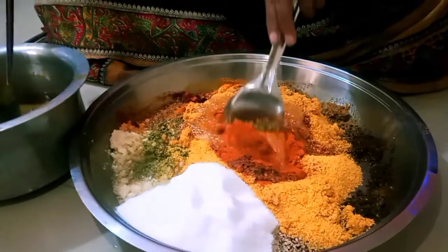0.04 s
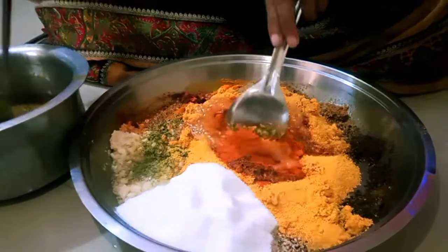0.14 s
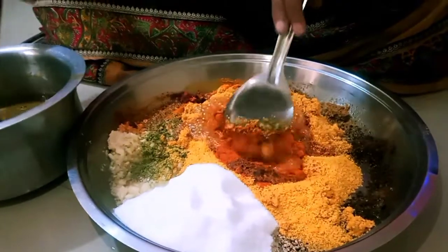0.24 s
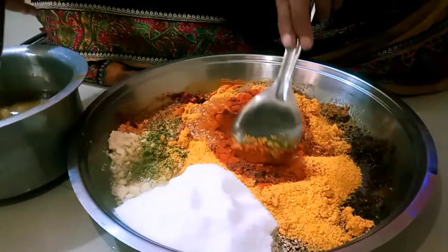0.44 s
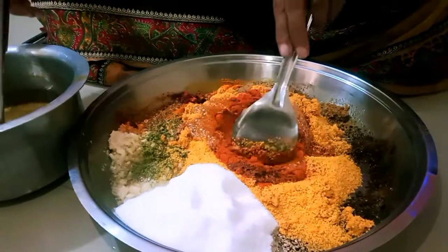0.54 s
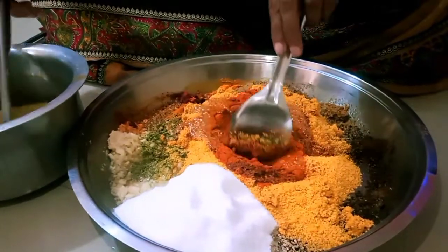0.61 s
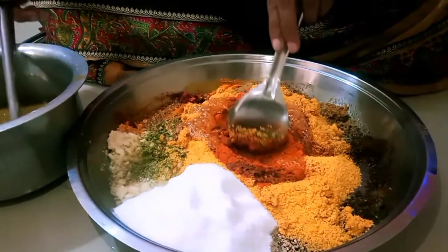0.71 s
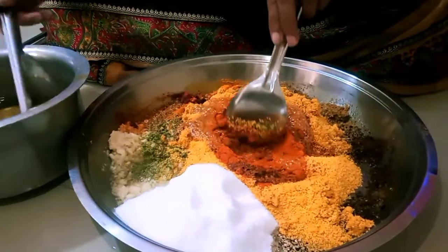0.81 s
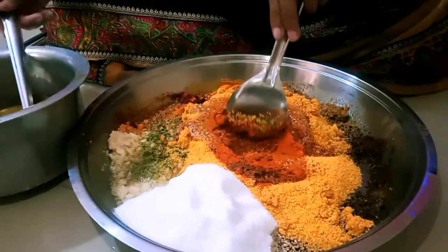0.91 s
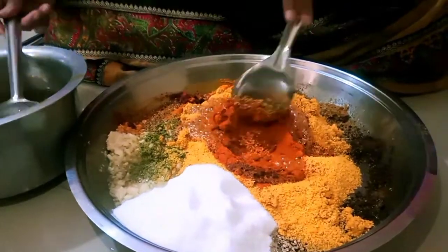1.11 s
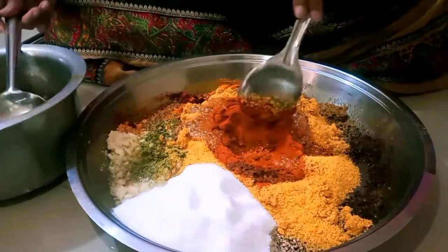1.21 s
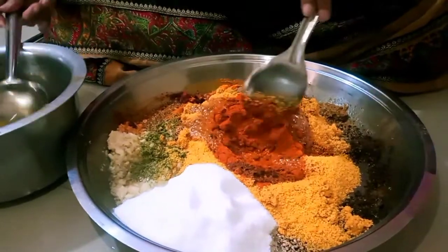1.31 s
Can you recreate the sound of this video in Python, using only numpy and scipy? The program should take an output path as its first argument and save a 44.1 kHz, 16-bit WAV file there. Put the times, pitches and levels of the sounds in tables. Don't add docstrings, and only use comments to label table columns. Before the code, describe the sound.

Close-miked in a reverberant kitchen, two bright rattling metal knocks with a short scrape between them ring out, followed by a soft tap, muffled stirring and tiny drips over faint sizzling and low room noise.

```python
import sys
import numpy as np
from scipy import signal
from scipy.fft import rfft, irfft
from scipy.io import wavfile
from scipy.ndimage import uniform_filter1d

SR = 44100
rng = np.random.default_rng(int(sys.argv[2]) if len(sys.argv) > 2 else 0)


def wav_out(sig):
    wavfile.write(sys.argv[1], SR, np.round(np.clip(np.atleast_2d(sig).T, -1, 1) * 32767).astype(np.int16))


def voltage_ratio(decibels):
    exponent = np.asarray(decibels, float) / 20
    return 10 ** exponent


N = 59535


def evened(x):
    return x / np.sqrt(np.mean(x ** 2) + 1e-20)


def unit_energy(x):
    return x / np.linalg.norm(x)


def read(points, hz):
    f, value = np.transpose(points)
    return np.interp(np.log(hz + 1), np.log(f + 1), value)


def curve(points):
    return np.interp(np.arange(N) / SR, *np.transpose(points))


def add(mix, s, sound):
    part = mix[round(s * SR):][:len(sound)]
    part += sound[:len(part)]


def colour(x, points):
    return irfft(rfft(x) * voltage_ratio(read(points, np.fft.rfftfreq(len(x), 1 / SR))), len(x))


def clicks(per_s, spread_db):
    size, sign, chance = rng.random((3, N))
    level = voltage_ratio(spread_db * np.minimum(-np.log(size + 1e-9), 5))
    return evened(level * np.sign(sign - .5) * (chance < per_s / SR))


def ring(hz, db, t60, size=200):
    pole = (2j * np.pi * hz - np.log(1000) / np.maximum(t60, .005)) / SR
    start = np.exp(np.arange(size)[:, None] * 128 * pole)
    start = start * voltage_ratio(db) * rng.choice([-1., 1.], len(hz))
    return (start @ np.exp(pole[:, None] * np.arange(128))).imag.ravel()


def crowd(shade, t60_of, count=1500, size=200):
    pitch, strength, life = rng.random((count, 3)).T
    hz = 560 + 15800 * ((np.arange(count) + pitch) / count) ** 1.2
    db = read(shade, hz) + 6 * (strength - .5)
    sound = ring(hz, db, t60_of(hz) * (0.58 + 0.52 * life), size=size)
    return sound / np.sqrt(np.sum(voltage_ratio(db) ** 2) / 2)


# frequency in Hz, level in dB per Hz.
FLOOR = [(42, -39), (62, -6.5), (130, 0.5), (370, -6), (1170, -9), (2700, -17), (7500, -23), (15500, -34)]
# frequency in Hz, width in Hz, level in dB.
HUM = [(68, 9.1, 2.5), (120, 8.2, 2), (165, 4, 3.5), (204, 13.4, 5), (593, 17, 6.5), (710, 93, 5.5),
       (1170, 69, 6.5)]
# time in seconds, level in dB.
SWELL = [
    (0, -2),
    (0.3, 3),
    (0.75, 5),
    (1.0, 0),
    (1.35, 0.5),
]
FLOOR_DB = -48


def room_noise():
    frames, hz = N // 1024 + 5, np.fft.rfftfreq(4096, 1 / SR)
    a, b, patches = rng.standard_normal((frames, 2049, 3)).T
    patches = uniform_filter1d(patches, size=40, axis=0)
    patches = evened(uniform_filter1d(patches, size=3, axis=1))
    drones = sum(db * np.exp(-((hz - f) / width) ** 2) for f, width, db in HUM)
    z = (a + 1j * b) * voltage_ratio((read(FLOOR, hz) + drones)[:, None] + 1.9 * patches)
    noise = signal.istft(z, nperseg=4096, noverlap=3072)[1][:N]
    return voltage_ratio(FLOOR_DB + curve(SWELL)) * evened(noise)


# frequency in Hz, t60 in seconds.
KITCHEN = [(300, 0.45), (2000, 0.51), (7000, 0.34), (15000, 0.33)]


def kitchen(x):
    taps = np.zeros(SR // 2)
    at = np.arange(120, len(taps) - 20, 20)
    taps[at + rng.integers(0, 20, len(at))] = rng.choice([-1., 1.], len(at))
    hz, t, z = signal.stft(taps, SR, nperseg=256)
    decay = voltage_ratio(-60 * t / read(KITCHEN, hz)[:, None])
    tail = signal.istft(z * decay, SR, nperseg=256)[1]
    return signal.fftconvolve(x, unit_energy(tail))[:N]


# time in seconds, level in dB.
FIZZ = [
    (0, -44),
    (0.06, -48),
    (0.2, -52.5),
    (0.6, -47.5),
    (0.75, -47.5),
    (0.9, -49),
    (1.0, -52.5),
    (1.35, -55),
]
# frequency in Hz, level in dB.
FIZZ_COLOUR = [(1000, -7.5), (2500, -8.5), (5000, -9.5), (6300, -3.5), (7600, 0.5), (9000, -8.5),
               (12000, -19.5), (15500, -15)]
BUBBLES_PER_S, BUBBLE_SPREAD_DB = 5000, 2


def fizz():
    bursts = colour(clicks(BUBBLES_PER_S, BUBBLE_SPREAD_DB), FIZZ_COLOUR)
    return voltage_ratio(curve(FIZZ)) * evened(bursts)


# start in seconds,
# peak in dB, pitch in Hz, t60 in seconds.
TICKS = [(0.303, -27, 7600, 0.017), (0.7437, -38, 5780, 0.022), (0.768, -44.5, 10270, .03),
         (0.7775, -32, 1990, 0.025), (0.782, -35, 4200, 0.05), (0.793, -34, 7250, 0.04),
         (0.785, -35, 7900, .03), (0.804, -38, 3130, 0.11), (0.814, -42, 5610, 0.054),
         (0.834, -49, 5650, 0.077), (0.8575, -34, 6910, 0.037), (0.874, -40.5, 3280, 0.013),
         (0.8917, -30, 7340, 0.05), (.903, -35, 7500, .04), (0.892, -41, 6340, .02),
         (0.916, -44, 7600, .04), (.735, -35, 7400, 0.033), (0.745, -40, 4460, .015), (.80, -40, 7440, .03),
         (.822, -44, 6700, .03), (.835, -41, 3200, .06), (.868, -43, 6820, .04), (.81, -40, 2030, 0.043),
         (0.952, -44, 9200, .015), (0.975, -48, 11820, 0.014), (1.0139, -42, 2990, 0.22),
         (1.013, -44, 4600, 0.05), (1.03, -45, 4400, .04), (1.014, -48, 3900, .06),
         (1.048, -43, 9100, 0.015), (1.227, -46, 1170, .05), (1.1421, -39, 1660, 0.04),
         (1.154, -39, 1710, 0.045), (1.183, -42, 1690, 0.045), (1.2528, -40, 2166, 0.034),
         (1.275, -47, 1930, .02), (1.3129, -42.5, 2084, 0.018)]
TICK_PAIR = .05
TICK_LONGEST_S, TICK_RISE_S = .25, 0.0024


def ticks():
    out, offsets = np.zeros(N), rng.uniform(-0.996, 1, (len(TICKS), 14))
    for (s, db, hz, t60), off in zip(TICKS, offsets):
        life = min(t60, TICK_LONGEST_S) * (1 - .5 * abs(off))
        x = ring(hz * (1 + TICK_PAIR * off), -8 * abs(off), life, size=80)
        x = x * np.minimum(np.arange(len(x)) / SR / TICK_RISE_S, 1)
        add(out, s, voltage_ratio(db) * x / abs(x).max())
    return out


# time in seconds, pressure in dB.
STIR = [
    (0.66, -91),
    (0.7, -39),
    (0.77, -44.5),
    (0.8, -39.5),
    (0.87, -48),
    (0.91, -51.5),
    (0.96, -97),
]
# frequency in Hz, level in dB per Hz.
STIR_COLOUR = [(400, -6), (1000, 3), (2100, -5.5), (3100, 1), (5000, -5.5), (7300, -0.5), (9500, -18.5),
               (15000, -21)]
STIR_PER_S, STIR_SPREAD_DB, STIR_T60 = 2000, 3, 0.038


def stir():
    many = crowd(STIR_COLOUR, lambda f: STIR_T60 + 0 * f, size=50)
    slips = clicks(STIR_PER_S, STIR_SPREAD_DB) * voltage_ratio(curve(STIR))
    return signal.fftconvolve(slips, unit_energy(many))[:N]


# time in seconds, pressure in dB.
DRAG = [
    (0.36, -78),
    (0.385, -43),
    (0.405, -35),
    (0.43, -36),
    (0.48, -39),
    (0.5, -98),
]
# time in seconds, pressure in dB.
BITE = [
    (.41, -66),
    (.428, -31),
    (.48, -33),
    (.495, -86),
]
# frequency in Hz, width in Hz, level in dB.
DRAG_RING = [(1500, 40, -9), (3900, 70, -3), (3970, 60, -7), (4740, 50, -12), (5011, 45, -11),
             (5620, 70, -11), (6060, 70, -15), (7140, 60, -9), (7688, 50, -7), (8750, 40, -12)]
# frequency in Hz, width in Hz, level in dB.
BITE_RING = [(1630, 30, -9), (2555, 35, -3), (2980, 40, -7), (3240, 30, 2)]
# frequency in Hz, level in dB per Hz.
DRAG_COLOUR = [(500, -0.5), (1500, -15), (2150, -9), (3500, 0.5), (5200, -13), (6500, -0.5), (8500, -10),
               (14000, -23)]
SLIPS_PER_S, SLIP_SPREAD_DB = 3000, 3
DRAG_CROWD_DB, DRAG_T60 = 1, 0.039


def wall_lines(table):
    hz, width, db = np.transpose(table)
    return unit_energy(ring(hz, db, 2.2 / width, size=50))


def drag():
    many = crowd(DRAG_COLOUR, lambda f: DRAG_T60 + 0 * f, size=50)
    body = wall_lines(DRAG_RING) + voltage_ratio(DRAG_CROWD_DB) * unit_energy(many)
    bite = wall_lines(BITE_RING)
    slips = clicks(SLIPS_PER_S, SLIP_SPREAD_DB)
    scrape = signal.fftconvolve(slips * voltage_ratio(curve(DRAG)), body)
    return (scrape + signal.fftconvolve(slips * voltage_ratio(curve(BITE)), bite))[:N]


# frequency in Hz, level in dB.
CRACK = [(5300, -22), (7500, 16.5), (10000, -3.5), (14000, -5), (16000, -11)]
CRACK_T60 = 0.032


def crack(lowest_hz, t):
    edge = [(.85 * lowest_hz, -50), (lowest_hz, -8)]
    return evened(colour(rng.standard_normal(len(t)), edge + CRACK)) * voltage_ratio(-60 * t / CRACK_T60)


KIN_SPREAD, KIN_DB, KIN_LIFE = .035, -16, .4
KIN_TILT_DB = 6


def kin_modes(hz, mode_db, t60):
    off_hz, off_db = np.moveaxis(rng.uniform(-1, 1, (8, len(hz), 2)), 2, 0)
    tilt_db = KIN_TILT_DB * np.log2(np.minimum(hz, 2500) / 2500)
    kin_hz = hz * (1 + KIN_SPREAD * off_hz)
    kin_db = mode_db + KIN_DB + tilt_db + 4 * off_db
    return ring(kin_hz.ravel(), kin_db.ravel(), np.tile(KIN_LIFE * t60, 8))


# start in seconds, level in dB, factor on the life of the weak modes.
KNOCKS = [
    (0.2263, -16.5, 1.46),
    (0.4829, -12.5, 0.68),
    (0.6909, -36.5, 0.6),
]
RIM_HZ = [860, 1109, 1314, 1960, 2515, 2600, 3210, 3270, 3348, 4118, 5012, 6050, 7180, 7595]
WALL_HZ = [556, 1304, 2627, 2947, 2988, 3115, 3250, 3354, 3598, 3838, 4177, 5927, 6380, 6688]
FOOT_HZ = [770, 1319, 1776, 3068, 4500, 6417, 6681, 7494]
# level in dB, t60 in seconds.
RIM = [(-3, 0.2), (-6, 0.2), (-8, .6), (-4, .2), (-8, .3), (-8, .25), (0, .45), (3, .22), (-8, .45),
       (-3, .2), (-1, .2), (2, .14), (0, .12), (5, .15)]
WALL = [(-10, 0.55), (-1, .45), (-8, .3), (-5, .42), (-2, .42), (2, .15), (7, .1), (-3, .35), (-5, .4),
        (-7, .45), (0, .2), (-3, .25), (1, .15), (-2, .3)]
FOOT = [(-6.5, 0.17), (-3, 0.11), (-10, 0.53), (-2, 0.11), (-5, .1), (-12, 0.16), (-19, 0.18), (-8, 0.22)]
# frequency in Hz, level in dB per Hz.
RIM_CROWD = [(740, -45), (900, -9.5), (2150, -15.5), (3200, -5.5), (5400, -11.5), (7600, 2.5), (9500, -9.5),
             (15000, -38)]
WALL_CROWD = [(640, -15), (1100, -12.5), (2050, -20), (3200, -3), (4400, -5.5), (5200, -16.5), (6400, -0.5),
              (12000, -29)]
FOOT_CROWD = [(180, -40), (300, -14), (696, -2.5), (1110, -22), (2440, -9.5), (3020, -6.5), (3810, -22),
              (7750, 6), (15500, -63)]
# frequency in Hz, t60 in seconds.
CROWD_T60 = [(500, 0.26), (3000, 0.41), (8000, 0.098), (15000, 0.2)]
# weak modes in dB, crack in dB, rise of the strong modes in seconds.
CROWD_DB = [-4, -1.5, 6.5]
CRACK_DB = [1.5, -2, -2.5]
SWING_S = [.005, .004, .001]
# delay in seconds, level in dB.
BOUNCES = [
    [(0, -4), (.0015, 5), (.0042, 5.5), (.0075, 5), (.016, -6), (.035, -2.5), (.066, -11), (.078, -9.5)],
    [(.0005, 1), (.0017, 3), (.0044, 4.5), (.0075, 1), (.017, -3), (.028, -20), (.06, -8.5)],
    [(0, 7.5), (.001, 7.5), (.004, 2), (.009, -1)],
]
# frequency in Hz, level in dB, t60 in seconds.
LADLE = [
    [(1015, -6, .15), (1498, -23, 0.59), (2972, -12, 0.51), (3764, -18, 0.47), (5800, -2, 0.1),
     (6900, -17, 0.16), (7130, 4, 0.13), (7872, -10, 0.098), (8129, -16, 0.22), (10200, -10, 0.2)],
    [(784, -11, 0.25), (1766, -20, 1), (2315, -6.5, 0.14), (4520, -5.5, 0.15), (5970, 3.5, 0.075),
     (7330, -1, .15), (7542, -22, 0.25), (8500, -2.5, 0.16), (11930, -9, 0.14), (13400, -12, .18)],
    [(7900, -10, .1)],
]


def knocks():
    weak_out, strong_out, t = np.zeros(N), np.zeros(N), np.arange(25600) / SR
    places = zip(KNOCKS, [RIM_HZ, WALL_HZ, FOOT_HZ], [RIM, WALL, FOOT],
                 [RIM_CROWD, WALL_CROWD, FOOT_CROWD], CROWD_DB, CRACK_DB, SWING_S, BOUNCES, LADLE)
    for (s, db, damp), hz, modes, shade, crowd_db, crack_db, swing, bounces, ladle in places:
        hz = np.array(hz)
        mode_db, t60 = np.transpose(modes)
        unit = np.sqrt(np.sum(voltage_ratio(mode_db) ** 2) / 2)
        strong = (ring(hz, mode_db, t60) + ring(*np.transpose(ladle))) / unit
        add(strong_out, s, voltage_ratio(db) * strong * np.minimum(t / swing, 1))
        many = crowd(shade, lambda f: damp * read(CROWD_T60, f))
        weak = kin_modes(hz, mode_db, t60) / unit + voltage_ratio(crowd_db) * many
        for delay, bounce_db in bounces:
            hit = weak + voltage_ratio(crack_db) * crack(hz[0], t)
            add(weak_out, s + delay, voltage_ratio(db - 7.5 + bounce_db) * hit)
    return weak_out, strong_out


STRONG_WET = .3
WET_DB, TICK_WET_DB, POT_LOW_HZ = -8, -7, 380


def scene():
    weak, strong = knocks()
    high_pass = signal.butter(3, POT_LOW_HZ, "high", fs=SR, output="sos")
    pot = signal.sosfilt(high_pass, weak + STRONG_WET * strong + drag() + stir())
    small = ticks()
    wet = kitchen(voltage_ratio(WET_DB) * pot + voltage_ratio(TICK_WET_DB) * small)
    return (pot + (1 - STRONG_WET) * strong + small + wet + fizz() + room_noise())[None]


def low_pass(x, hz):
    return signal.oaconvolve(x, signal.firwin(511, hz, window=("kaiser", 8), fs=SR)[None], "same")


def top_cut(x):
    return signal.sosfilt(signal.butter(12, 16440, fs=SR, output="sos"), x)


EDGE_HZ, TOP_HZ, LEAK_DB = 15450, 16400, -40


def record(dry):
    low, wide = low_pass(dry, EDGE_HZ), low_pass(dry, TOP_HZ)
    mix = low + voltage_ratio(LEAK_DB) * (wide - low)
    return top_cut(mix)


dry = scene()
out = record(dry)
wav_out(out)
```